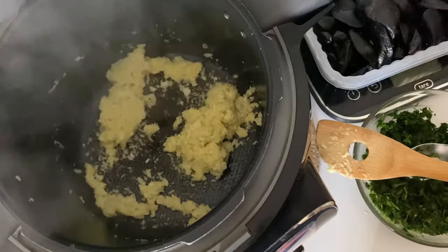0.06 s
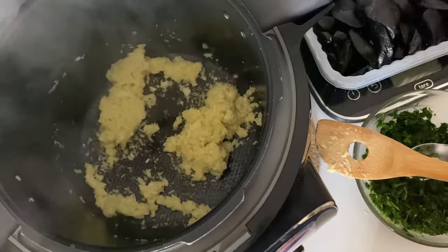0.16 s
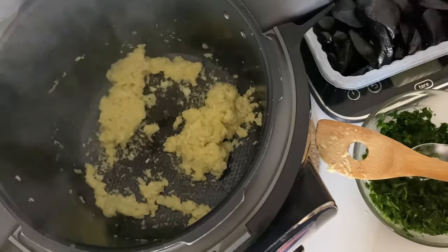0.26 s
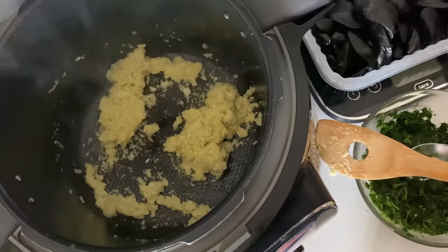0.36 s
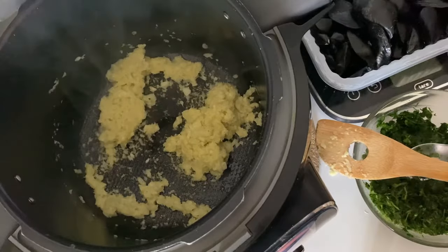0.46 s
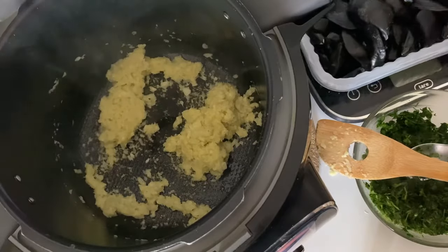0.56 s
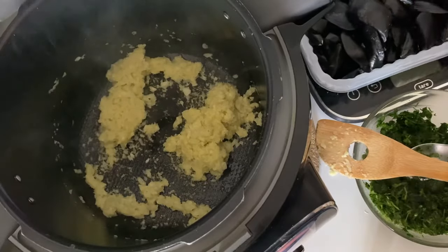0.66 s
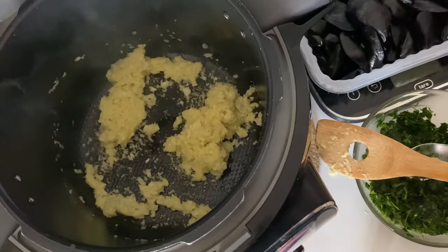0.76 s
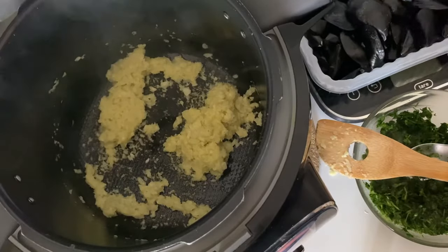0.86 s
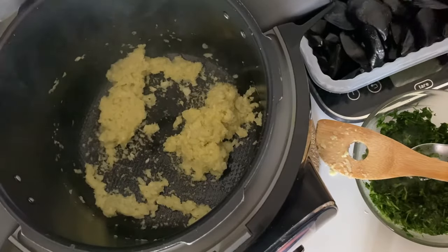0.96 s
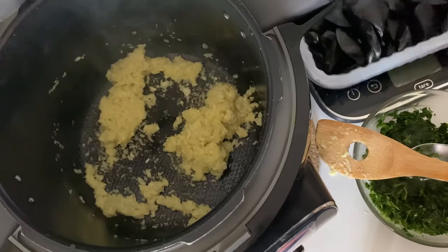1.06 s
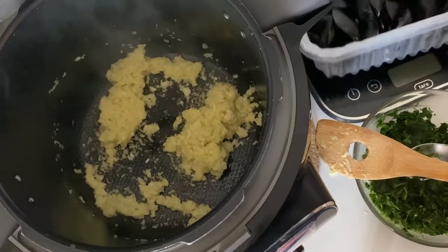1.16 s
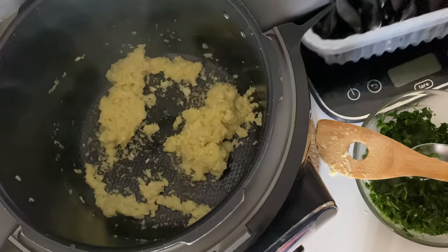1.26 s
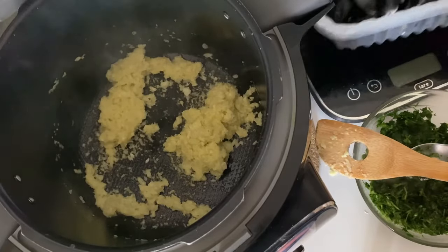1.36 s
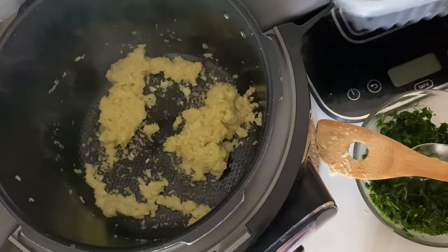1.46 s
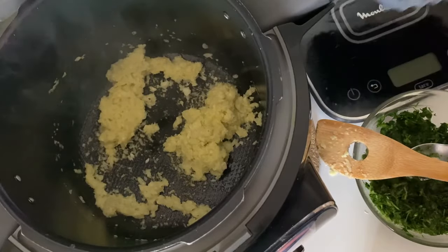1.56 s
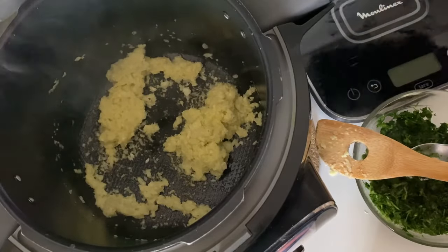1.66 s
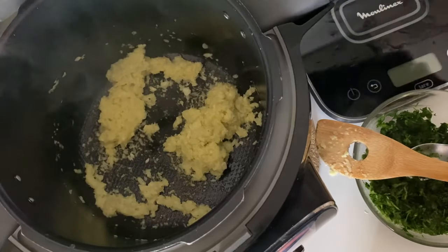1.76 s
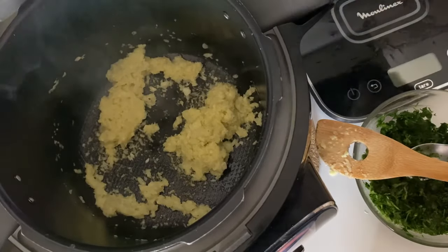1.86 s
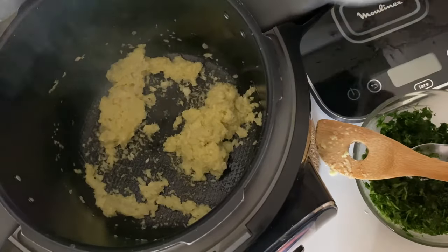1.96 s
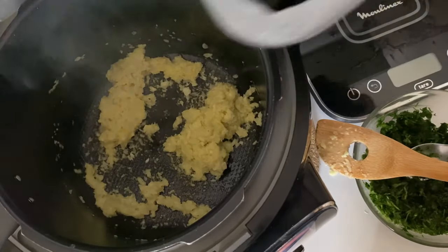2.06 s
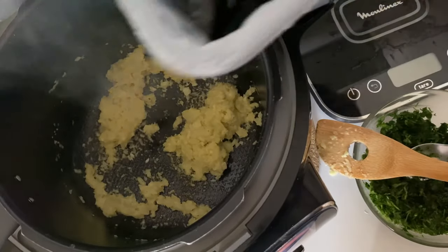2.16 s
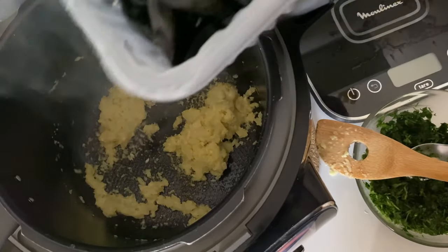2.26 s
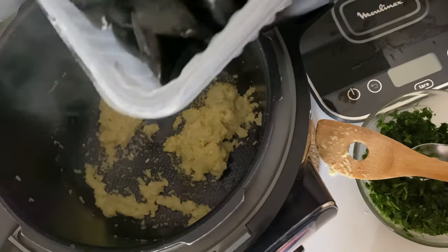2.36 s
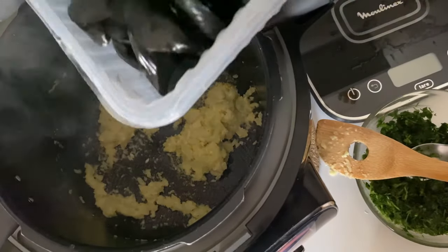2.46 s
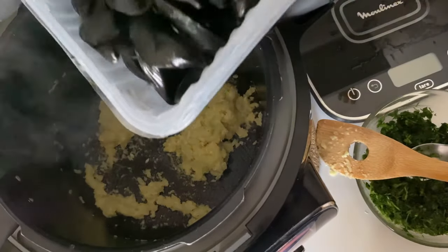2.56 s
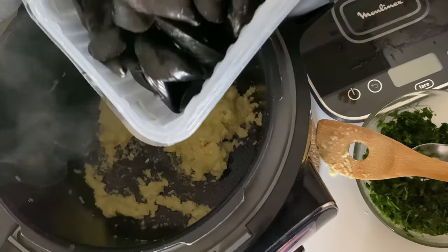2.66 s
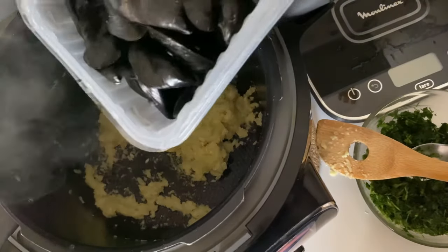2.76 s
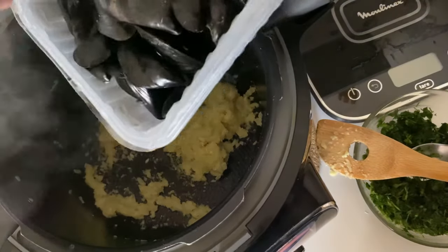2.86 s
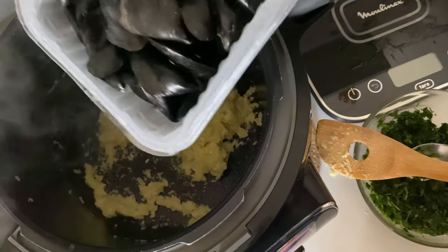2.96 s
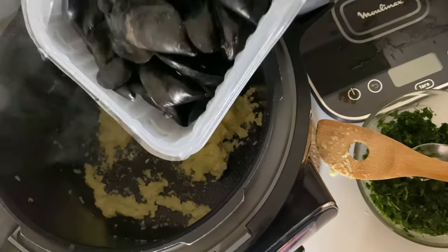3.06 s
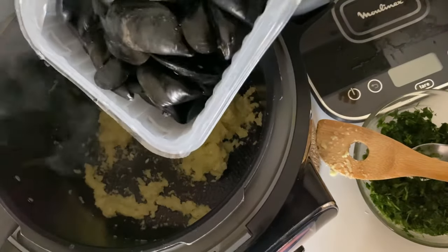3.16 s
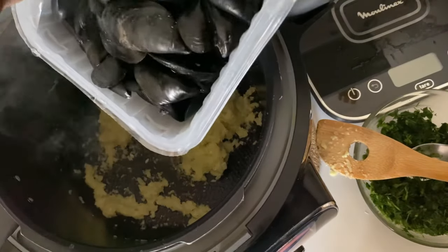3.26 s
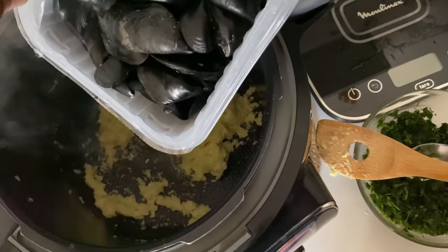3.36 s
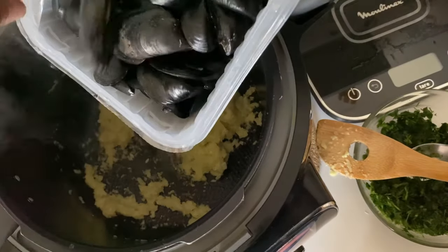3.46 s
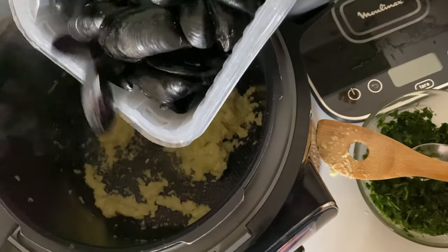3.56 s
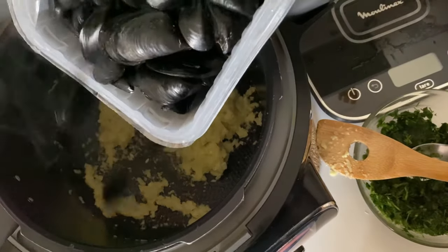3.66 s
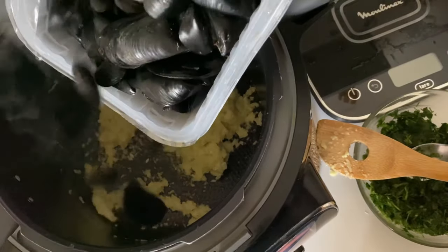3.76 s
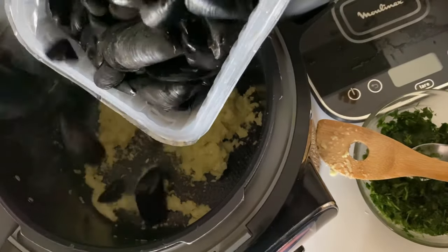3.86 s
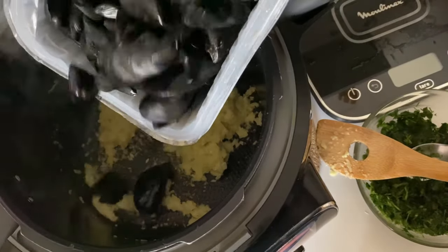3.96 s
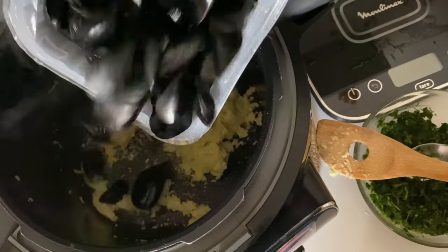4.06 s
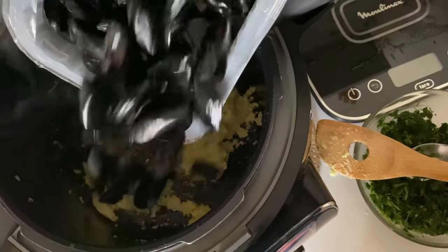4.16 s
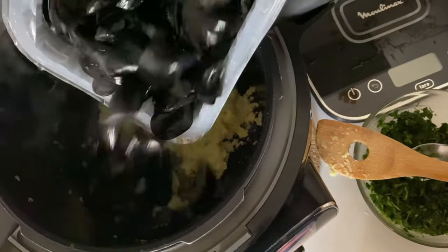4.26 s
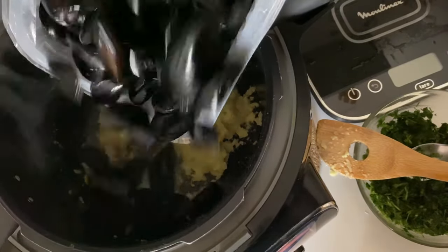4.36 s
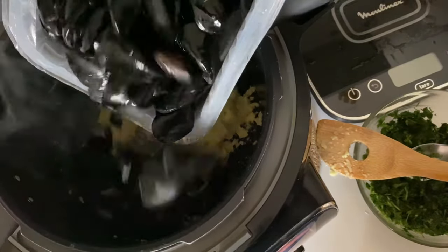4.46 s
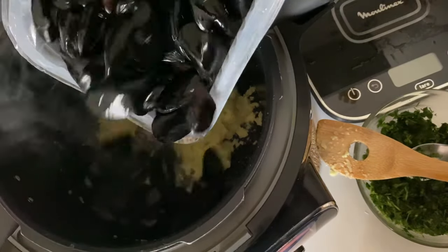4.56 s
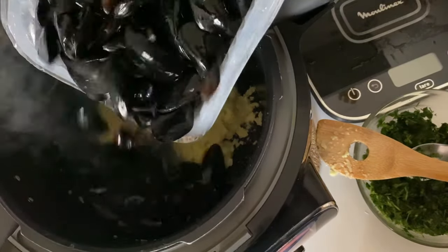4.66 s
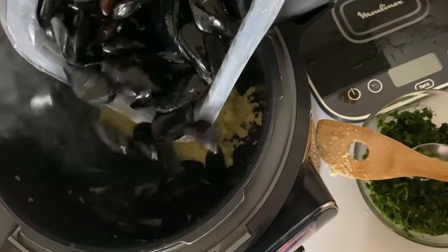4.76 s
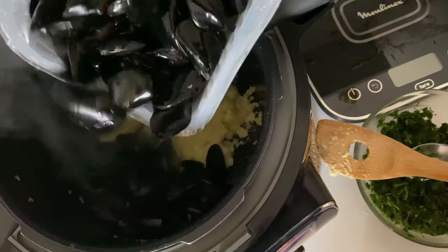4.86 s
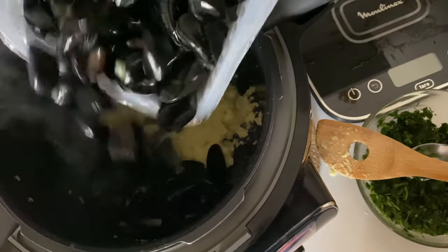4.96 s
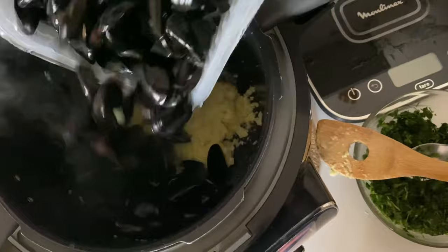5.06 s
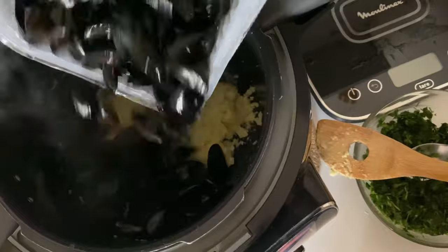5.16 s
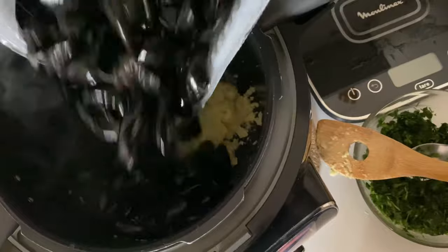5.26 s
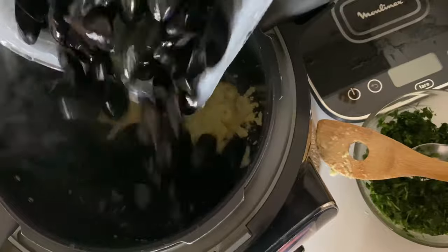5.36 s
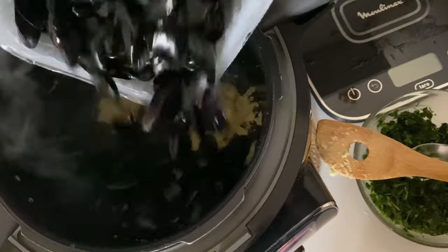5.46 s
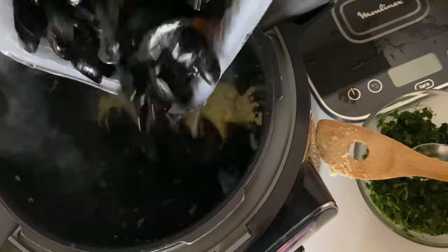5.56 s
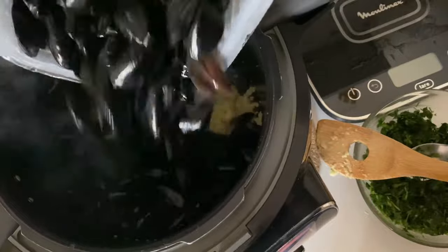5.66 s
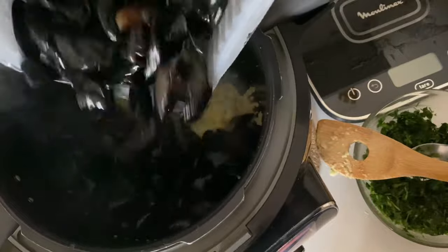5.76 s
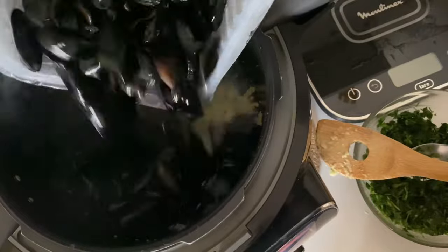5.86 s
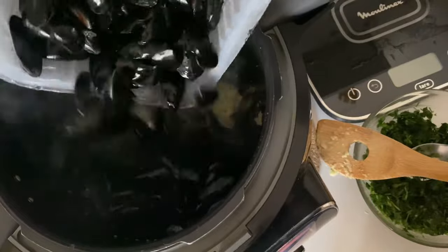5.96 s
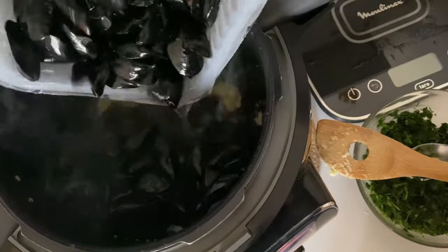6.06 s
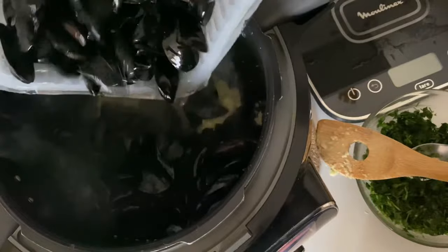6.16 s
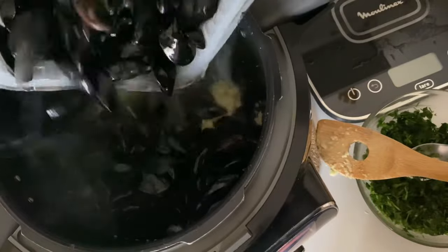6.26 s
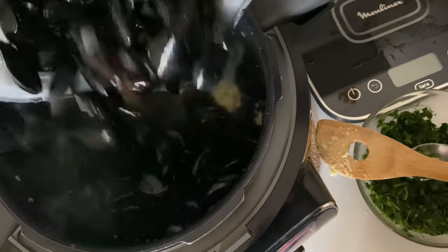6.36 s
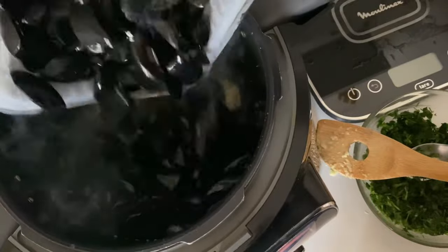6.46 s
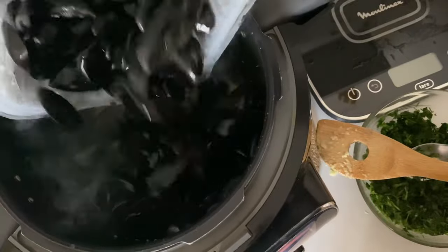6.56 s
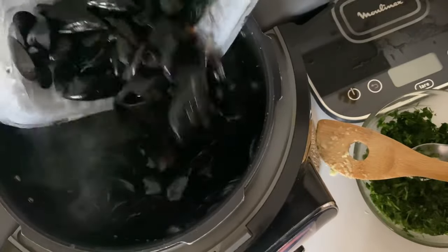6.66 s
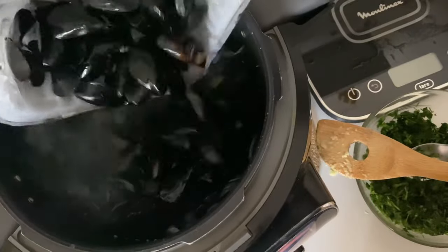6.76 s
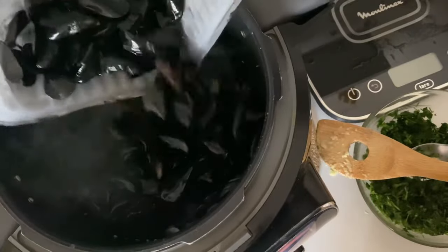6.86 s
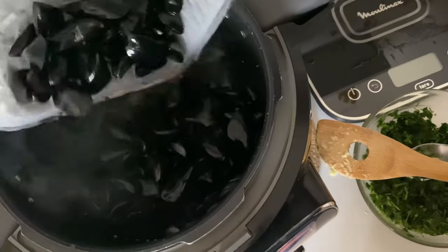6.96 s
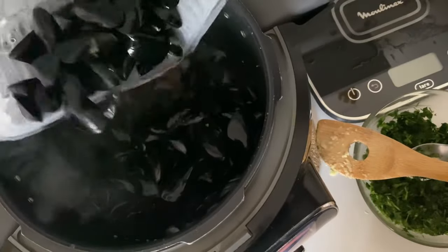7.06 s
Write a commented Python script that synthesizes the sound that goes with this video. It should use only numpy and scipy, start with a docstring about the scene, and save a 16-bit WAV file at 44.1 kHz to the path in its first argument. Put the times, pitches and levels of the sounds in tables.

```python
"""A kitchen, with a cooker pot close to the ear: onion and garlic sizzle as filtered noise over a low wavering hum.
A plastic tray of mussels is lifted and tipped: damped bumps, then single shells as short rings and noise bursts.
The heap slides in, in surges: dense random contacts clatter, clink, knock and thud on the bottom.
Resonant modes make the pot ring faintly; a decaying noise tail is the kitchen's answer."""
import sys
import numpy as np
from scipy import signal
from scipy.fft import rfft, irfft, next_fast_len
from scipy.io import wavfile
from scipy.ndimage import map_coordinates

SR = 44100
rng = np.random.default_rng(int(sys.argv[2]) if len(sys.argv) > 2 else 0)


def materialize(psi):
    """Save the field psi as 16-bit PCM at rate SR to the path in sys.argv[1].

    A 1-D psi becomes a single channel; in a 2-D psi each row is a channel.
    """
    bounded = np.clip(np.atleast_2d(psi).T, -1, 1)
    quanta = np.round(bounded * 32767).astype(np.int16)
    wavfile.write(sys.argv[1], SR, quanta)


N = 313110
TIME = np.arange(N) / SR
BLOW = np.arange(2048) / SR  # time axis of one blow, s

# All levels are relative, before the trims in the functions.
# Loudest shells striking each other and the pot: start_s, level_db, ring_hz, thud_db, crack_db (both re level)
SHELL_BLOWS = [(3.324, -9, 4620, -23, -17), (3.364, -20.5, 6500, -29, -11), (3.371, -13.5, 3180, -25, -18),
               (3.429, -13, 4830, -23, -15.5), (3.495, -12, 896, -19.5, -26),
               (3.564, -10.5, 3300, -26, -22), (3.606, -7, 3980, -13, -14.5), (3.711, -6, 1170, -15, -17.5),
               (3.785, -7.5, 740, -10.5, -38), (3.811, -7, 5870, -40, -9), (3.83, 0.5, 620, -11, -21.5),
               (3.874, -10.5, 345, -13, -17), (3.9, -3, 820, -13, -20.5), (3.959, -3, 3220, -17.5, -14),
               (3.995, 1, 2750, -41.5, -26.5), (4.041, -3, 2760, -21, -30), (4.125, -4, 537, -15.5, -24),
               (4.168, -9, 3170, -12.5, -7.5), (4.222, 1.5, 3140, -22.5, -18.5),
               (4.279, -2.5, 5070, -44, -8.5), (4.312, -1.5, 5100, -48, -14.5),
               (4.345, -1.5, 4900, -17.5, -16), (4.362, 0.5, 4930, -26.5, -16),
               (4.417, -4, 5040, -43, -17.5), (4.499, -5, 5000, -56, -12), (4.511, 3, 2930, -53, -15.5),
               (4.552, -3, 3520, -23, -14.5), (4.711, -12.5, 748, -14.5, -27), (4.737, 1, 5880, -27, -16),
               (4.767, -4.5, 1750, -34, -23), (4.777, -7.5, 1430, -21, -16.5), (4.838, -15, 1940, -31, -28),
               (4.858, -5, 1134, -24, -20), (4.89, -4, 1650, -22, -14.5), (4.9, -4.5, 4720, -21, -7.5),
               (4.973, -7.5, 1490, -18, -24), (4.989, -6, 2060, -26, -15), (5.009, -9, 1060, -13, -18),
               (5.047, 4.5, 1502, -23, -20.5), (5.107, -5, 1640, -22, -15), (5.128, -1, 3310, -37, -21.5),
               (5.157, -3.5, 1515, -38, -15.5), (5.18, -8.5, 1470, -31, -13), (5.206, -6.5, 640, -23, -19),
               (5.242, -4.5, 5140, -42, -11.5), (5.251, -1.5, 1510, -37, -21.5),
               (5.261, -7, 1650, -24, -17), (5.341, -8, 5000, -21, -18), (5.356, -1, 5020, -41, -18),
               (5.373, 1, 2800, -26, -15), (5.382, -0.5, 4900, -29, -18), (5.499, -4.5, 5120, -40, -17),
               (5.992, -7, 5120, -50, -15.5), (6.034, -10, 5800, -22, -12.5),
               (6.144, -9, 626, -16.5, -18.5), (6.269, -7, 690, -24, -13.5), (6.336, -8, 3600, -17, -22),
               (6.424, -6, 1880, -38, -13.5), (6.485, -1.5, 3260, -47, -16.5),
               (6.672, -10, 5250, -21, -11.5), (6.761, -2.5, 3290, -42, -14), (6.835, -11, 4400, -38, -13),
               (6.902, -3.5, 8460, -44, -14.5), (6.93, -11.5, 1880, -20.5, -15),
               (7.01, -14.5, 870, -21, -33)]
# Slides of the heap: start_s, length_s, clatter_db, thud_db (re clatter)
HEAP_SLIDES = [(3.258, 0.32, -39.5, -4), (3.694, 0.25, -34, 2.5), (3.983, 0.12, -25, -4),
               (4.091, 0.049, -20.5, -2), (4.208, 0.15, -22.5, -13), (4.486, 0.055, -23.5, -32),
               (4.385, 0.42, -35.5, -5.5), (4.807, 0.18, -30, -12.5), (4.953, 0.26, -27.5, -8),
               (5.124, 0.24, -25.5, -2), (5.322, 0.064, -18, -15), (5.4, 0.13, -23.5, -9.5),
               (5.536, 0.45, -26, -8.5), (6.048, 0.18, -30, -3.5), (6.215, 0.16, -27, -0.5),
               (6.389, 0.41, -23.5, -6.5), (6.832, 0.22, -33.5, -0.5)]
# Shells left rocking on their backs: start_s, level_db, ring_hz
ROCKING_SHELLS = [(3.379, -42, 4050), (3.722, -32.5, 4000), (4.011, -31, 2700)]
# Bumps of the tray as it is lifted, tilted and shaken: start_s, level_db, ring_hz, click_db (re level)
TRAY_BUMPS = [(0.061, -26, 239, -17), (1.085, -29, 1010, 5), (2.754, -26, 300, -24), (2.877, -20, 333, -30),
              (2.901, -25, 890, -7), (2.921, -21, 870, -5), (3.036, -29.5, 930, -7), (3.148, -30, 870, -9),
              (3.226, -32.5, 2580, 3), (6.275, -15.5, 188, -21), (6.363, -12, 244, -2),
              (6.389, -13, 780, -17), (6.654, -16.5, 173, -20), (6.736, -16, 650, -6),
              (6.808, -15.5, 690, -18)]
# Shells shifting in the tray as it is gripped and tilted: start_s, length_s, level_db
TRAY_SHIFTS = [(0, 0.034, -41), (2.732, 0.52, -44)]
# Resonances of the air in the pot and of its wall: mode_hz, width_hz, level_db
POT_MODES = [(369, 40, -2), (612, 24, 6), (1030, 34, -1), (1564, 250, -0.5), (5144, 44, 9)]
# Reverberation of the kitchen: freq_hz, t60_s
KITCHEN_DECAY = [(200, 0.27), (2000, 0.75), (12000, 0.0091)]
# Fat drops popping in the oil: start_s, level_db
FAT_POPS = [(0.045, -18), (0.849, -16), (0.949, -25), (1.391, -15), (2.516, -24)]
# Kitchen hum: time_s, level_db, pitch_hz
HUM_TRACK = [(0, -48, 60.4), (1.5, -50.5, 71), (3.8, -52, 77.7), (4.5, -68, 67.1), (6.8, -53, 62.1),
             (7, -45, 58.7)]
# Spectrum of edges clattering: freq_hz, level_db (per Hz)
CLATTER_SPECTRUM = [(500, -0.5), (1500, -11), (2800, -7), (5000, -7), (9000, -7.5), (16000, -17)]
# Spectrum of a shell edge cracking: freq_hz, level_db (per Hz)
CRACK_SPECTRUM = [(1500, -29.5), (3500, -4.5), (5500, -1.5), (10000, -6.5), (16000, -20)]
# Spectrum of a thud on the pot: freq_hz, level_db (per Hz)
THUD_SPECTRUM = [(60, -24), (130, -1.5), (300, 3), (900, 3.5), (1500, 3), (4000, -49)]
# Spectrum of a woody clack: freq_hz, level_db (per Hz)
CLACK_SPECTRUM = [(300, -18), (1000, -10.5), (2800, -3), (5000, -15.5), (16000, -55)]
# Spectrum of the frying: freq_hz, level_db (per Hz)
SIZZLE_SPECTRUM = [(150, -29), (400, -11.5), (850, -16.5), (1300, -4), (1800, -3.5), (5500, 0.5), (7500, 1),
                   (11000, 2.5), (16000, -2.5)]
# Spectrum of the kitchen rumble: freq_hz, level_db (per Hz)
RUMBLE_SPECTRUM = [(25, -29), (60, 4), (95, -13), (125, -2.5), (170, -12), (330, -12), (2000, -23)]

# Blows are dry while still in the tray and linger once they land in the pot
TRAY_T60_S, POT_T60_S, LANDING_S = 0.015, 0.028, 3.58
# A shell struck on its edge cracks and hardly rings; the loss is in dB of ring per dB of crack
RING_DB, USUAL_CRACK_DB, RING_LOSS_DB_PER_DB = -22.5, -16, 0.34
SLIDE_ATTACK_S, SETTLE_DB_PER_S = 0.023, 152
# Knocks and clinks are damped once a bed of shells covers the bottom
KNOCK_BARE_DB, KNOCK_BED_DB, COVERED_S, COVERING_S = -3.5, -9.5, 5.34, 0.035
# One falling shell jolts its neighbours, so contacts bunch up
BUNCH_DB, BUNCH_RATE_HZ = 1.5, 85
ROCK_GAP_S, ROCK_LOSS_DB = 0.01, 3
# Frying calms as the pot cools
FRY_HOT_DB, FRY_CALM_DB, FRY_CALMING_S = -35, -42, 3.9
# The level dips briefly
DIP_S, DIP_WIDTH_S = 0.284, 0.0057
LOW_CUT_HZ, TOP_HZ = 34, 15850


def amp(db):
    """Decibels to gain."""
    return 10 ** (np.asarray(db) / 20)


def unit(x):
    """Each row at rms 1."""
    return x / np.sqrt(np.mean(x ** 2, axis=-1, keepdims=True) + 1e-20)


def along(points, freq_hz):
    """(Hz, value) points interpolated on a log frequency axis."""
    point_hz, value = np.transpose(points)
    return np.interp(np.log(freq_hz + 1), np.log(point_hz + 1), value)


def curves(rows):
    """One value per sample for each column after the time."""
    time_s, *columns = np.transpose(rows)
    return [np.interp(TIME, time_s, column) for column in columns]


def wobble(rate_hz):
    """Smooth random curve, rate_hz knots a second."""
    knots = rng.standard_normal(int(N * rate_hz / SR) + 4)
    return map_coordinates(knots, [TIME * rate_hz])


def filtered(x, response):
    """Each row times a complex response of frequency."""
    n = x.shape[-1]
    padded = next_fast_len(n + min(n, SR // 2))
    freq_hz = np.fft.rfftfreq(padded, 1 / SR)
    return irfft(rfft(x, padded) * response(freq_hz), padded)[..., :n]


def resonance(freq_hz, mode_hz, width_hz):
    """Causal band-pass response of one mode."""
    damping = 1j * freq_hz * width_hz
    return damping / (mode_hz * mode_hz - freq_hz * freq_hz + damping)


def coloured(x, spectrum, size=4096):
    """Each row through a minimum-phase filter with the given spectrum, at rms 1."""
    gain = amp(along(spectrum, np.fft.rfftfreq(size, 1 / SR)))
    cepstrum = irfft(np.log(gain))
    # folding the cepstrum makes the filter causal
    cepstrum[1:size // 2] *= 2
    cepstrum[size // 2:] = 0
    kernel = irfft(np.exp(rfft(cepstrum)))[:size // 2]
    shaped = signal.fftconvolve(np.atleast_2d(x), kernel[None], axes=1)
    return unit(shaped[:, :x.shape[-1]].reshape(x.shape))


def bursts(t60_s, count):
    """Blows scattered by the pot wall into dense echoes that build up and die quickly, one a row."""
    build_up = 1 - np.exp(-BLOW / 0.0003)
    decay = amp(-60 * BLOW / t60_s)
    return unit(rng.standard_normal((count, len(BLOW))) * decay * build_up)


def rings(ring_hz, t60_s, q, echo=2):
    """One blow a row: a brief uneven contact sets a shell ringing at its own pitch, blurred by echoes."""
    ring_hz = ring_hz[:, None]
    width_hz = ring_hz / q
    echoes = filtered(bursts(t60_s, count=len(ring_hz)), lambda f: resonance(f, ring_hz, width_hz))
    onset = 1 - np.exp(-ring_hz * BLOW)
    direct = np.sin(2 * np.pi * ring_hz * BLOW) * np.exp(-np.pi * width_hz * BLOW) * onset
    return unit(unit(direct) + echo * unit(echoes))


def placed(start_s, rows):
    """Rows summed at their start times."""
    first = np.round(np.asarray(start_s)[:, None] * SR).astype(int)
    index = first + np.arange(len(BLOW))
    return np.bincount(np.maximum(index, 0).ravel(), rows.ravel(), N)[:N]


def jostle(rate_hz, low_hz, high_hz, t60_s, q, spread_db):
    """Steady stream of small ringing contacts, random in timing, strength and pitch."""
    count = int(rate_hz * N / SR)
    when, size, pitch = rng.random((count, 3)).T
    start_s = (np.arange(count) + 2 * when) / rate_hz
    ring_hz = low_hz * (high_hz / low_hz) ** pitch
    gain = amp(spread_db * size ** 2)[:, None]
    return placed(start_s, gain * rings(ring_hz, t60_s, q, echo=1))


def surges(start_s, length_s, level_db):
    """Gain of shells on the move: each surge gathers, keeps going and settles; their powers add."""
    since_s = TIME - start_s[:, None]
    gather = np.clip(since_s / SLIDE_ATTACK_S, 0, 1)
    settle_db = SETTLE_DB_PER_S * np.maximum(since_s - length_s[:, None], 0)
    return np.linalg.norm(gather * amp(level_db[:, None] - settle_db), axis=0)


def shells():
    """Each blow: the shell's own clear ring, a woody clack, a bright crack of the edge, a thud of the pot."""
    start_s, level_db, ring_hz, thud_db, crack_db = np.transpose(SHELL_BLOWS)
    count = len(start_s)
    t60_s = np.where(start_s < LANDING_S, TRAY_T60_S, POT_T60_S)[:, None]
    ring_db = np.minimum(RING_DB - RING_LOSS_DB_PER_DB * (crack_db - USUAL_CRACK_DB), -15)
    # small high shells ring for more cycles than dull low knocks
    q = 26 * (ring_hz[:, None] / 2700) ** 0.88
    ring = amp(ring_db)[:, None] * rings(ring_hz, t60_s, q, echo=0.95)
    # a hard landing clacks as well; a glancing touch mostly rings
    clack_gain = amp(crack_db - 14.5) + amp(thud_db - 7.5)
    clack = clack_gain[:, None] * coloured(bursts(t60_s, count), CLACK_SPECTRUM)
    crack = amp(crack_db - 3.5)[:, None] * coloured(bursts(t60_s, count), CRACK_SPECTRUM)
    thud = amp(thud_db - 8.0)[:, None] * coloured(bursts(1.96 * t60_s, count), THUD_SPECTRUM)
    return placed(start_s, amp(level_db)[:, None] * (ring + clack + crack + thud))


def heap():
    """Sliding mass: bunched contacts; edges clatter and tick, shells clink or knock, weight thuds in the pot."""
    start_s, length_s, clatter_db, thud_db = np.transpose(HEAP_SLIDES)
    covered = (1 + np.tanh((TIME - COVERED_S) / COVERING_S)) / 2
    knock_db = KNOCK_BARE_DB + (KNOCK_BED_DB - KNOCK_BARE_DB) * covered
    edges = jostle(rate_hz=520, low_hz=2000, high_hz=13000, t60_s=0.016, q=2.5, spread_db=12)
    clatter = coloured(edges, CLATTER_SPECTRUM)
    clink = unit(jostle(rate_hz=90, low_hz=1900, high_hz=4200, t60_s=0.016, q=15, spread_db=11))
    knock = unit(jostle(rate_hz=100, low_hz=800, high_hz=1960, t60_s=0.018, q=5.5, spread_db=13))
    landings = jostle(rate_hz=150, low_hz=231, high_hz=1250, t60_s=0.025, q=1.74, spread_db=7.5)
    thud = coloured(landings, THUD_SPECTRUM)
    ticks = unit(jostle(rate_hz=130, low_hz=5000, high_hz=15000, t60_s=0.006, q=1.3, spread_db=22))
    hollow = amp(knock_db) * (amp(-1.0) * clink + knock)
    rattle = amp(2.0) * clatter + amp(-6.5) * ticks + hollow
    # on the bed of shells the tumbling evens out
    bunches = unit(amp(BUNCH_DB * (1 - covered / 2) * wobble(BUNCH_RATE_HZ)))
    rattling = surges(start_s, length_s, clatter_db) * rattle
    thudding = surges(start_s, length_s, clatter_db + thud_db) * thud
    return bunches * (rattling + thudding)


def rocking(count=6):
    """A rocking shell touches down at uneven gaps, a little softer each time, always at its own pitch."""
    start_s, level_db, ring_hz = np.repeat(ROCKING_SHELLS, count, axis=0).T
    touch = np.arange(len(start_s)) % count
    touch_s = start_s + ROCK_GAP_S * (touch + 0.5 * rng.random(len(start_s)))
    gain = amp(level_db - ROCK_LOSS_DB * touch)[:, None]
    return placed(touch_s, gain * rings(ring_hz, TRAY_T60_S, q=33, echo=0.88))


def tray():
    """The plastic tray takes dull, heavily damped bumps and rumbles softly as its load shifts."""
    start_s, level_db, ring_hz, click_db = np.transpose(TRAY_BUMPS)
    clicks = coloured(bursts(TRAY_T60_S, count=len(start_s)), CLACK_SPECTRUM)
    bumps = rings(ring_hz, t60_s=0.038, q=2.9, echo=0.74) + amp(click_db)[:, None] * clicks
    shifting = unit(jostle(rate_hz=240, low_hz=105, high_hz=750, t60_s=0.04, q=1.6, spread_db=8))
    bumping = placed(start_s, amp(level_db - 13.5)[:, None] * bumps)
    return bumping + surges(*np.transpose(TRAY_SHIFTS)) * shifting


def pot(x, count=24):
    """The pot rings on after whatever lands in it; its wall adds a crowd of faint high modes."""
    wall = [(mode_hz, 28, -4) for mode_hz in rng.uniform(3500, 13000, count)]
    modes = list(POT_MODES) + wall
    return filtered(x, lambda f: sum(amp(db) * resonance(f, hz, width_hz) for hz, width_hz, db in modes))


def kitchen(x):
    """A short room tail, each frequency dying at its own speed."""
    freq_hz, time_s, noise = signal.stft(rng.standard_normal(SR // 2), SR, nperseg=256)
    decay = amp(-60 * time_s / along(KITCHEN_DECAY, freq_hz)[:, None])
    tail = signal.istft(noise * decay, SR, nperseg=256)[1]
    delayed = np.pad(x, (300, 0))  # samples
    return signal.fftconvolve(delayed, tail / np.linalg.norm(tail))[:N]


def sizzle():
    """Countless tiny steam bubbles burst in the oil; a few spit louder; pot air and wall sing along."""
    hiss_db = FRY_CALM_DB + (FRY_HOT_DB - FRY_CALM_DB) * np.exp(-TIME / FRY_CALMING_S)
    fizz = coloured(rng.standard_normal(N) * amp(1.47 * wobble(500)), SIZZLE_SPECTRUM)
    struck = rng.random(N) < 55 / SR  # 55 spits a second on average
    impulses = struck * rng.standard_normal(N) * amp(10 * rng.random(N))
    spit = coloured(signal.fftconvolve(impulses, bursts(0.0023, count=1)[0])[:N], SIZZLE_SPECTRUM)
    air = unit(filtered(
        rng.standard_normal(N),
        lambda f: resonance(f, 1101, 105) ** 2 + 0.93 * resonance(f, 409, 22) ** 2))
    wall = filtered(fizz, lambda f: resonance(f, 5220, 200))
    dip = 1 - np.exp(-((TIME - DIP_S) / DIP_WIDTH_S) ** 2)
    return dip * amp(hiss_db) * (fizz + spit / 4 + amp(-16.5) * air + amp(-5.5) * wall)


def spatter():
    """Now and then a fat drop bursts with a short dry pop."""
    start_s, level_db = np.transpose(FAT_POPS)
    pops = coloured(bursts(0.0098, count=len(start_s)), SIZZLE_SPECTRUM)
    return placed(start_s, amp(level_db - 24.5)[:, None] * pops)


def hum():
    """A low sine of wavering level and gliding pitch in a soft kitchen rumble of filtered noise."""
    level_db, pitch_hz = curves(HUM_TRACK)
    phase = 2 * np.pi * np.cumsum(pitch_hz) / SR
    tone = np.sin(phase) * amp(0.72 * wobble(14))
    rumble = coloured(rng.standard_normal(N), RUMBLE_SPECTRUM)
    return amp(level_db) * (tone + amp(3.0) * rumble)


def scene():
    """Shells and tray with pot ring and room, over the frying and the hum."""
    blows = shells() + rocking() + heap() + tray()
    blows = blows + amp(-6) * pot(blows)
    room = amp(-16) * kitchen(blows)
    return (amp(-3.5) * (blows + room) + sizzle() + spatter() + hum())[None]


def record(dry):
    """Thins the deepest bass, rounds off the highest peaks and cuts steeply above TOP_HZ."""
    high_pass = signal.butter(3, LOW_CUT_HZ, "highpass", fs=SR, output="sos")
    thinned = signal.sosfilt(high_pass, dry)
    rounded = thinned / (1 + np.abs(thinned / 0.85) ** 4) ** (1 / 4)
    return filtered(rounded, lambda f: 1 / (1 + (f / TOP_HZ) ** 300))


dry = scene()
out = record(dry)
materialize(out)
```